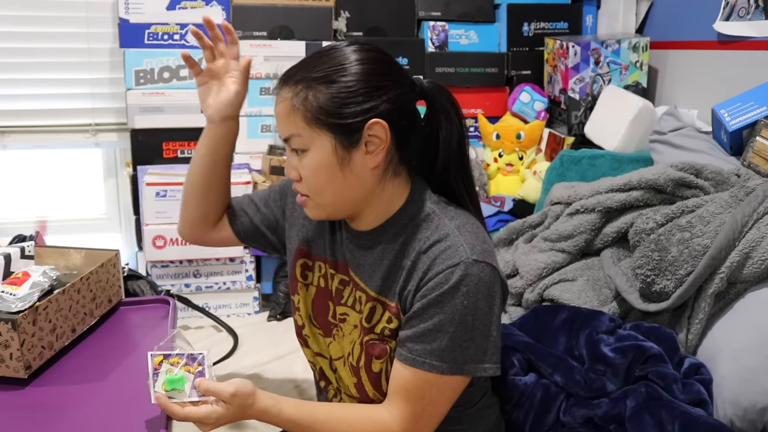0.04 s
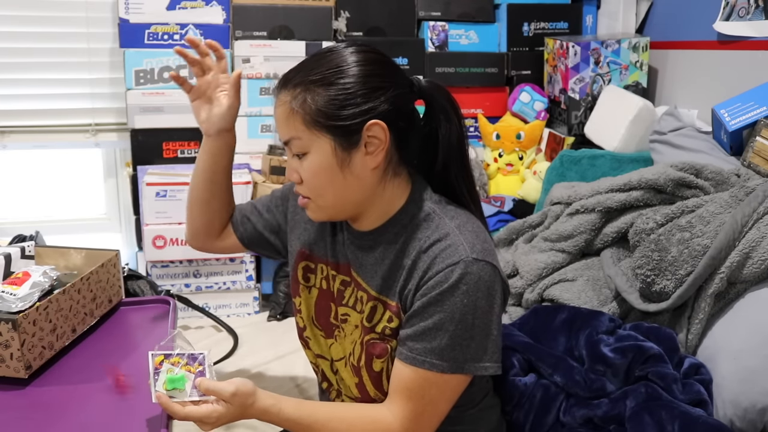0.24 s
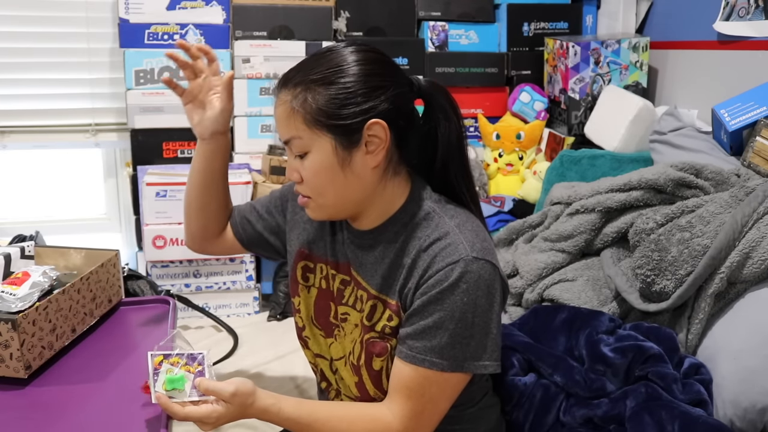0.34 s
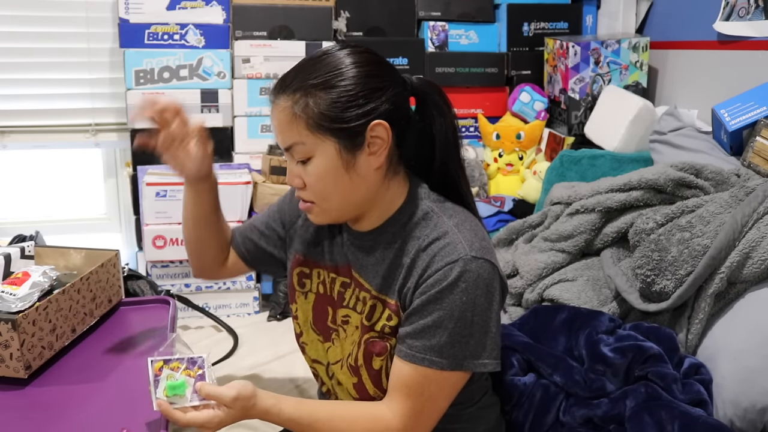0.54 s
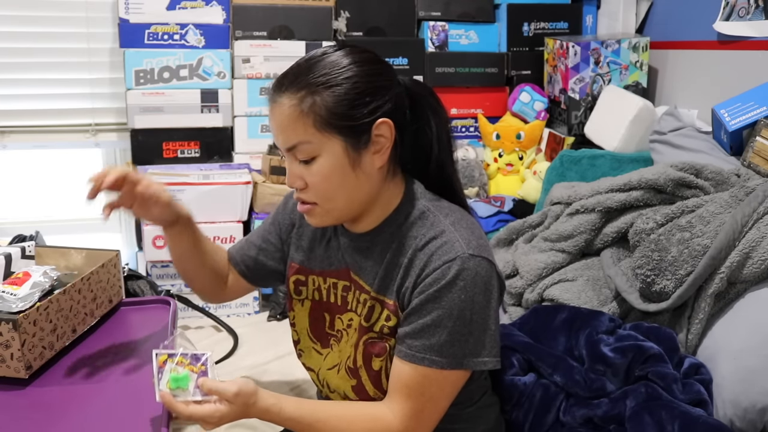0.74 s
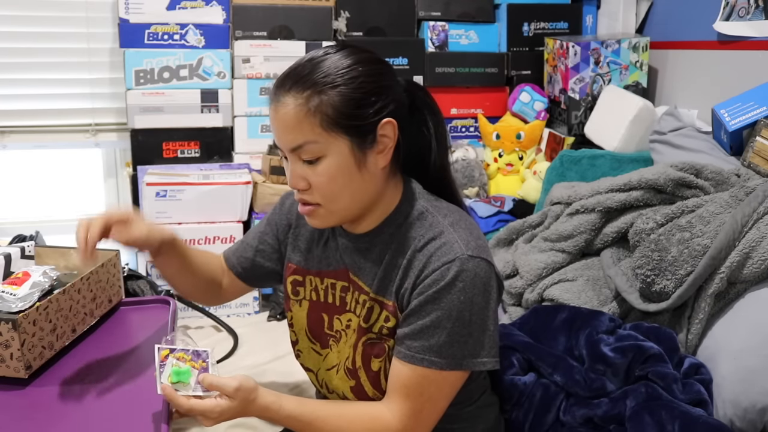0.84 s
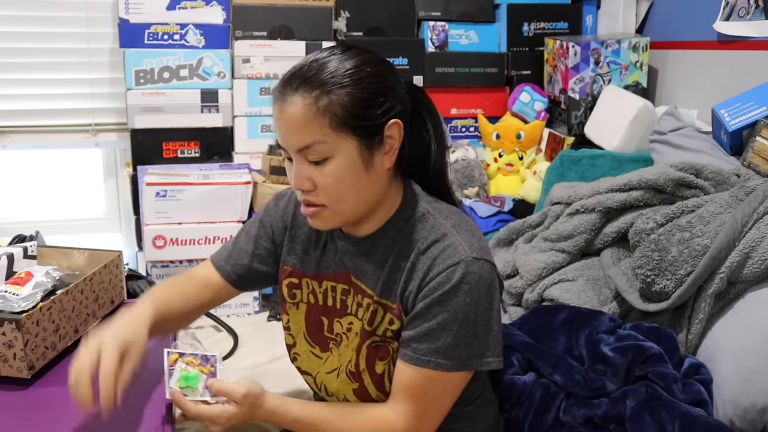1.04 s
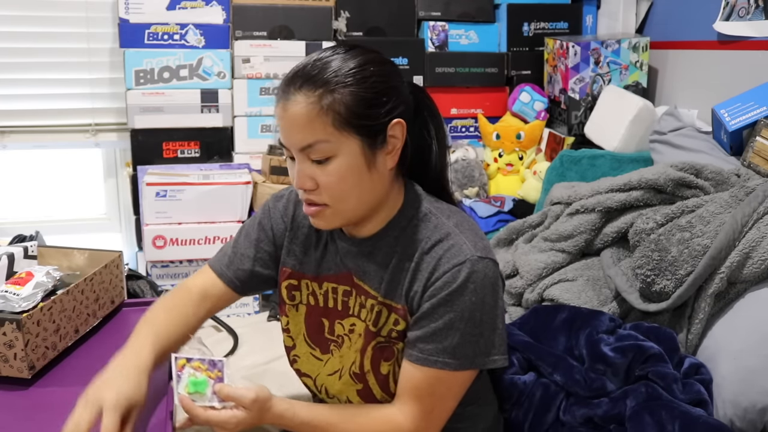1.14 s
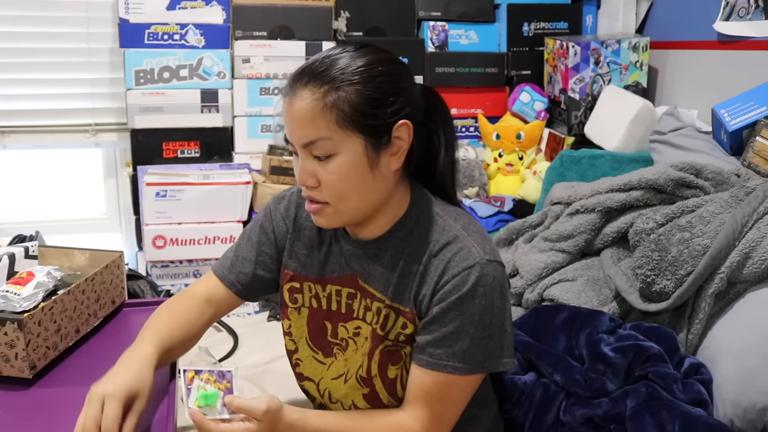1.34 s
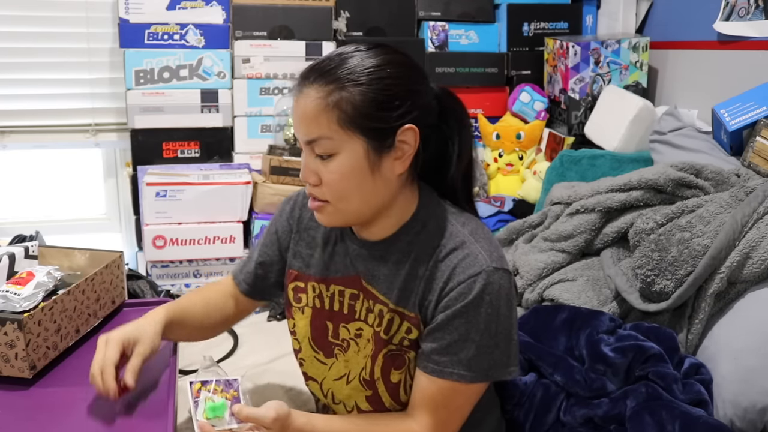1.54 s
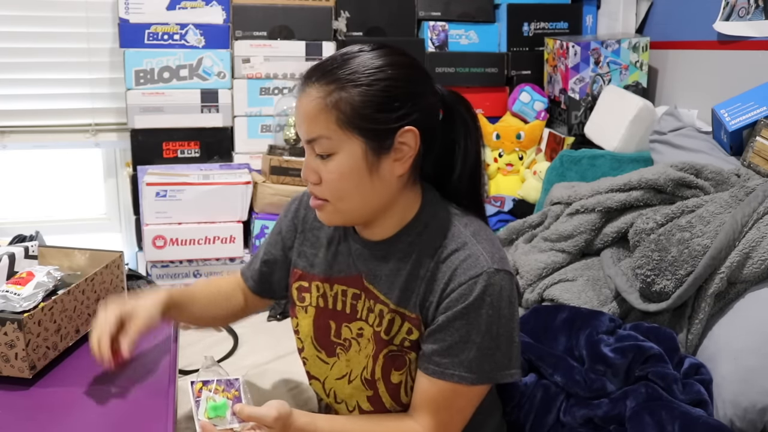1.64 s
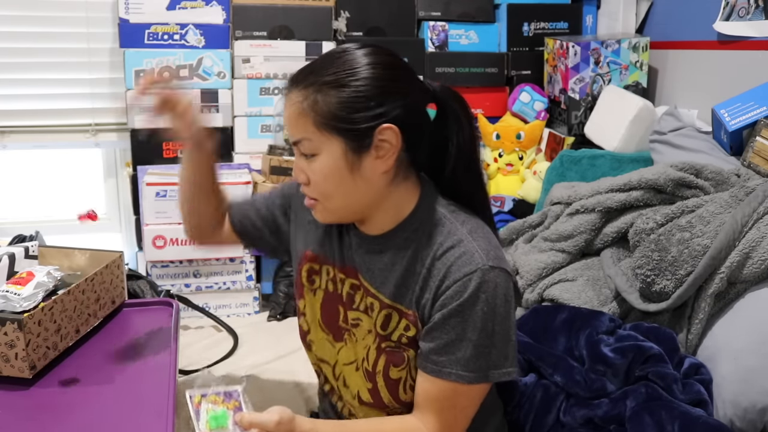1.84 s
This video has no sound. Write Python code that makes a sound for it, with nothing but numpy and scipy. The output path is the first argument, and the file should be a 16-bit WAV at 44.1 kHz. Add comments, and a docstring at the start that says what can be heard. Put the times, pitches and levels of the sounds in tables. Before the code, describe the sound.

Small plastic figures clatter onto a plastic tray, bouncing with sharp clicks, then settling in a quiet room

```python
"""Small plastic figures are tossed onto a plastic tray in a small room, tumble with sharp clicks, then settle.
Each contact is a shaped pulse that rings the tray: clear modes, a dense ring of decaying noise and the room.
Loose pieces rattle in bursts of tiny random collisions, and flexing panels knock as short low tones.
A tiny high tick comes before the first rattle; a faint mains buzz of spikes and a hiss lie underneath."""
import sys
import numpy as np
from scipy import signal
from scipy.fft import rfft, irfft
from scipy.io import wavfile

SR = 44100
rng = np.random.default_rng(int(sys.argv[2]) if len(sys.argv) > 2 else 0)


def generate_wav(sig):
    """Save sig (samples, or channels by samples) to the path in sys.argv[1] as 16-bit PCM at SR."""
    pcm = np.round(np.clip(np.atleast_2d(sig).T, -1, 1) * 32767).astype(np.int16)
    wavfile.write(sys.argv[1], SR, pcm)


N = 83790
T = np.arange(N) / SR

# Contacts of a figure with the tray. Each row: contact time in seconds, click peak in dB, click centre in Hz,
# click top in Hz, tray ring against the click in dB, hard-edge tick against the push in dB.
CONTACTS = [(.3322, -25, 2120, 15040, 5, -25), (0.4169, -18.5, 2480, 14400, 10, -24),
            (.4913, -1.8, 1200, 5600, -4.5, 2), (.4944, -9, 950, 4500, -5, -16),
            (.5236, -11, 1830, 15000, 2, -15), (.5468, -10.5, 2100, 8000, -5, -22),
            (.5500, -11, 2276, 15000, 3, -20), (.5940, -7.5, 2050, 8990, -6, -45),
            (.6013, -6, 2500, 6440, 0, -36), (.6405, -15, 1760, 5800, 2, -44),
            (.6491, -7.5, 2000, 9500, -4, -28), (.6673, -6, 2150, 9500, -3.5, -28),
            (.6839, -6.5, 2400, 9500, -3.5, -26), (.6987, -18, 1760, 6900, 5.5, -61.5),
            (.7318, -17.5, 1630, 5650, -1, -30), (.7367, -18.5, 1490, 5960, 0.5, -27),
            (.7545, -15, 1730, 5630, 1.5, -28), (.7710, -20, 1820, 6900, -7.5, -37),
            (.7795, -13.5, 2050, 6940, 0, -30), (.8149, -16.5, 1670, 6700, 2, -19),
            (.8558, -23.5, 1410, 4264, -1, -25), (.9079, -23.5, 1510, 4470, -1, -14),
            (.9618, -18, 1940, 7340, -0.5, -25.5), (1.0285, -25.5, 1134, 3350, 2.5, 3),
            (1.1340, -22, 1730, 4460, -2, -21), (1.1880, -24, 1420, 3990, -3, -20),
            (1.2661, -27.5, 1110, 8000, -1.5, -8), (1.2787, -27.5, 1290, 6000, 1, -18),
            (1.2890, -27.5, 1104, 5930, 0.5, -18)]
# Bursts of rattling. Each row: start in seconds, rise in seconds, decay T60 in seconds, level in dB, then against
# the main rattle the low body in dB, rasp in dB and fine sizzle in dB, and time to the sizzle's decay in seconds.
RATTLE_BURSTS = [(.188, 0.037, 0.32, -28.5, -8.5, -19, -26, 0.045),
                 (.330, .026, 0.64, -27.5, -11.5, -13, -23, 0.067),
                 (.416, 0.017, 0.44, -29.5, -38, -6, -24.5, 0.042),
                 (.522, 0.031, 0.53, -27.5, -22, -16.5, -23.5, 0.078),
                 (.640, 0.034, 0.36, -32, -7.5, -33, -36.5, .05),
                 (.745, 0.054, 0.083, -33.5, -26, -42, -52, .04),
                 (1.254, 0.037, 0.13, -41.5, -7, -13, -26, 0.035)]
# Dull knocks as the tray's panels flex. Each row: start in seconds, pitch in Hz, level in dB,
# time constant of the rise in seconds, decay T60 in seconds.
PANEL_KNOCKS = [(.198, 473, -26.5, 0.01, 0.22), (.208, 246.5, -25, 0.012, 0.094),
                (0.33, 337.5, -32, 0.0054, .13), (0.419, 281, -42, .003, .1),
                (.492, 322, -28.5, 0.0023, 0.071), (.492, 429.4, -21.5, .001, .09),
                (.495, 183.6, -43, .006, 0.14), (1.266, 175, -45, .004, 0.096),
                (1.265, 863, -31.5, 0.0027, 0.067)]
# Modes of the tray. Each row: frequency in Hz, relative level in dB.
TRAY_MODES = [(622, -9), (810, -5), (902, -3), (1143, 1), (1209, 0), (1254, -1), (1390, -1), (1508, -2),
              (1764, -3), (1860, -3), (2163, -1), (2635, -1), (2759, -1), (2903, -1)]
# Spectrum of the tray's dense ring and of the room. Each row: frequency in Hz, relative density in dB.
RING_SPECTRUM = [(100, -18), (300, 2.5), (600, 2), (1200, 2), (2500, -3.5), (4000, -2.5), (5600, -5),
                 (8000, -4.5), (11000, -1), (15000, -0.5)]
# Spectrum of the main rattle. Each row: frequency in Hz, relative density in dB.
RATTLE_SPECTRUM = [(100, -28.5), (300, -22.5), (600, 2.5), (1100, 4), (2000, 0), (3000, 3.5), (4200, -3),
                   (5800, -9.5), (7200, -25.5), (10000, -39), (15000, -51.5)]
# Spectrum of the rattle's low body. Each row: frequency in Hz, relative density in dB.
BODY_SPECTRUM = [(60, -33), (130, -19.5), (250, -10), (450, -3.5), (650, 1), (1000, -15), (3000, -44.5)]
# Spectrum of the rattle's rasp. Each row: frequency in Hz, relative density in dB.
RASP_SPECTRUM = [(3000, -30), (4500, -13), (5100, 2.5), (5800, 2.5), (6500, -9), (7900, -12), (8800, -23.5),
                 (15000, -43)]
# Spectrum of the rattle's fine sizzle. Each row: frequency in Hz, relative density in dB.
SIZZLE_SPECTRUM = [(2000, -26), (6000, 0.5), (8500, 5.5), (10500, -2.5), (13000, -3.5), (15500, -8)]
# Spectrum of the background hiss. Each row: frequency in Hz, relative density in dB.
HISS_SPECTRUM = [(25, -5), (60, -1.5), (130, 4), (300, 2.5), (550, -4), (1200, -4), (3000, -11),
                 (8000, -14), (15000, -22.5)]

MAINS_HZ, BUZZ_START_S, BUZZ_DECAY_S = 60, .0009, 0.00076
BUZZ_DB, BUZZ_LOW_HZ, BUZZ_TOP_HZ, HISS_DB = -64.5, 52.3, 4200, -68.5
PING_S, PING_HZ, PING_DB, PING_LENGTH_S = .1768, 3900, -40, 0.00057
GRAINS_PER_S, RATTLE_LOW_HZ = 3200, 128
SIZZLE_RISE_S, SIZZLE_T60_S = .006, 0.083
CONTACT_SLOPE, CLICK_LOW_HZ, RING_LOW_HZ = 7, 266, 170
LOW_DB_PER_OCTAVE = 26.5  # a blow this much quieter starts an octave higher
MODES_DB, MODE_T60_S, MODE_REF_HZ, MODE_DAMPING = -11, .17, 1000, .5
RING_DB, RING_T60_S, RING_BUILD_S = 1.5, 0.074, .0008
RING_SHARED = .5  # part of the dense ring's power that is alike for all blows
ROOM_DB, ROOM_T60_S, ROOM_BUILD_S, ROOM_DAMP_HZ = -12.5, 0.1, .008, 9000
BASS_CUT_HZ, TOP_HZ = 43.2, 15600


def undb(db):
    """Decibels to gain."""
    return 10 ** (np.asarray(db) / 20)


def unit(x):
    """Scale to an energy of one."""
    return x / np.sqrt(np.sum(x ** 2))


def level(x, db):
    """Scale to an rms level."""
    return x * undb(db) / np.std(x)


def colour(x, points):
    """Shape a sound with a spectrum, joining its points on a log frequency scale."""
    hz, db = np.array(points).T
    f = np.maximum(np.fft.rfftfreq(len(x), 1 / SR), 1)
    gain = undb(np.interp(np.log(f), np.log(hz), db))
    return irfft(rfft(x) * gain, len(x))


def cut(x, hz, kind, order=2):
    """Low-pass or high-pass."""
    sos = signal.butter(order, min(hz, SR / 2 - 1), kind, fs=SR, output="sos")
    return signal.sosfilt(sos, x)


def fade(t, t60):
    """Exponential decay by 60 dB in t60 seconds."""
    return np.exp(-np.log(1000) * t / t60)


def envelope(start, rise, length, t60):
    """Rise, hold until the length is over, then decay."""
    swell = np.clip((T - start) / rise, 0, 1)
    return swell * fade(np.maximum(T - start - length, 0), t60)


def add(out, x, start_s):
    """Mix a sound in at a time."""
    i = int(start_s * SR)
    out[i:i + len(x)] += x[:N - i]


def hiss():
    """Steady noise with a falling top."""
    return level(colour(rng.standard_normal(N), HISS_SPECTRUM), HISS_DB)


def mains_buzz():
    """Mains buzz: a small decaying spike of alternating sign twice in each cycle."""
    half_cycles = 2 * MAINS_HZ * (T - BUZZ_START_S)
    sign = 1 - 2 * (np.floor(half_cycles) % 2)
    since_spike_s = (half_cycles % 1) / (2 * MAINS_HZ)
    spikes = sign * np.exp(-since_spike_s / BUZZ_DECAY_S)
    spikes = cut(spikes, BUZZ_TOP_HZ, "low", order=1)
    spikes = cut(spikes, BUZZ_LOW_HZ, "high", order=1)
    return level(spikes, BUZZ_DB)


def ping():
    """A tiny high tick just before the first rattle: a sine under a bell-shaped swell."""
    swell = np.exp(-((T - PING_S) / PING_LENGTH_S) ** 2)
    return undb(PING_DB) * swell * np.sin(2 * np.pi * PING_HZ * T)


def knocks():
    """A landing flexes one panel of the tray, which answers with a short low tone."""
    out = np.zeros(N)
    for start, hz, db, rise, t60 in PANEL_KNOCKS:
        shape = (1 - np.exp(-T / rise)) * fade(T, t60)
        add(out, undb(db) * shape * np.sin(2 * np.pi * hz * T), start)
    return out


def chatter():
    """A stream of tiny collisions at random moments, equal in size and random in sign."""
    hit = rng.random(N) < GRAINS_PER_S / SR
    return hit * np.sign(rng.standard_normal(N))


def rattling():
    """Loose pieces chatter on the shaken tray: bursts swell and die away, each with a fine sizzle on top."""
    out = np.zeros(N)
    for start, rise, t60, db, body_db, rasp_db, sizzle_db, length in RATTLE_BURSTS:
        pieces = level(colour(chatter(), RATTLE_SPECTRUM), 0)
        pieces += level(colour(chatter(), BODY_SPECTRUM), body_db)
        pieces += level(colour(chatter(), RASP_SPECTRUM), rasp_db)
        sizzle = level(colour(chatter(), SIZZLE_SPECTRUM), sizzle_db)
        burst = pieces * envelope(start, rise, rise, t60)
        burst += sizzle * envelope(start, SIZZLE_RISE_S, length, SIZZLE_T60_S)
        out += undb(db) * burst
    return cut(out, RATTLE_LOW_HZ, "high")


def tray_modes():
    """Decaying modes of the tray, the higher ones shorter; each blow draws new starting phases."""
    t = T[:SR // 3]
    out = np.zeros(len(t))
    for hz, db in TRAY_MODES:
        t60 = MODE_T60_S * (MODE_REF_HZ / hz) ** MODE_DAMPING
        out += undb(db) * fade(t, t60) * np.sin(2 * np.pi * (hz * t + rng.random()))
    return unit(out)


def tray_ring(common):
    """The tray's answer to a blow: clear modes, a short dense ring partly alike for all blows, and the room."""
    t = T[:len(common)]
    own, room = rng.standard_normal((2, len(t)))
    mixed = np.sqrt(RING_SHARED) * common + np.sqrt(1 - RING_SHARED) * own
    dense = unit(colour(mixed, RING_SPECTRUM) * fade(t, RING_T60_S))
    room = cut(colour(room, RING_SPECTRUM), ROOM_DAMP_HZ, "low")
    room = unit(room * fade(t, ROOM_T60_S) * (1 - np.exp(-t / ROOM_BUILD_S)))
    ring = undb(RING_DB) * dense + undb(ROOM_DB) * room + undb(MODES_DB) * tray_modes()
    return ring * (1 - np.exp(-(t / RING_BUILD_S) ** 2))


def click(hz, low_hz, top_hz, tick_db, size=512):
    """One push and pull of air, shorter for a harder contact; an edge adds a thin tick."""
    f = np.fft.rfftfreq(size, 1 / SR)
    u = f / hz
    push = 1j * u / (1 + u ** 2 / CONTACT_SLOPE) ** ((CONTACT_SLOPE + 1) / 2)
    spectrum = push / irfft(push).max() + 1j * undb(tick_db)
    low_cut = f ** 2 / np.hypot(f ** 2, low_hz ** 2)
    pulse = irfft(spectrum * low_cut / (1 + (f / top_hz) ** 10))
    return np.roll(pulse / pulse.max(), size // 2)  # centred in its frame


def figures():
    """Every contact of a figure clicks and rings the tray; heavier blows reach further into the bass."""
    out = np.zeros(N)
    common = rng.standard_normal(SR // 3)
    for contact_s, db, hz, top_hz, ring_db, tick_db in CONTACTS:
        lightness = 2 ** (-db / LOW_DB_PER_OCTAVE)
        pulse = click(hz, CLICK_LOW_HZ * lightness, top_hz, tick_db)
        response = undb(ring_db) * cut(tray_ring(common), RING_LOW_HZ * lightness, "high")
        response[0] += 1  # the click itself, ahead of the ring
        blow = undb(db) * signal.fftconvolve(pulse, response)
        add(out, blow, contact_s - len(pulse) / 2 / SR)
    return out


def scene():
    """Clicks, rattling, knocks, ping, buzz and hiss at one microphone."""
    mix = hiss() + mains_buzz() + ping() + knocks() + rattling() + figures()
    return mix[None]


def record(dry):
    """The recorder cuts the deep bass and, steeply, the top."""
    dry = cut(dry, BASS_CUT_HZ, "high", order=4)
    top_cut = signal.ellip(10, .2, 80, TOP_HZ, fs=SR, output="sos")  # ripple, then rejection in dB
    return signal.sosfilt(top_cut, dry)


dry = scene()
out = record(dry)
generate_wav(out)
```